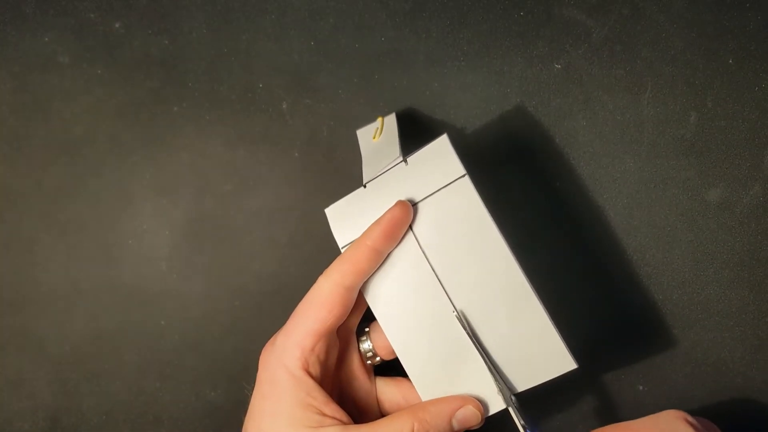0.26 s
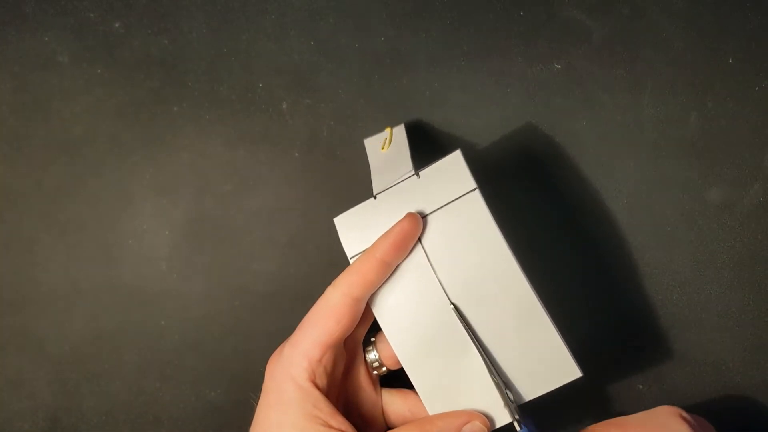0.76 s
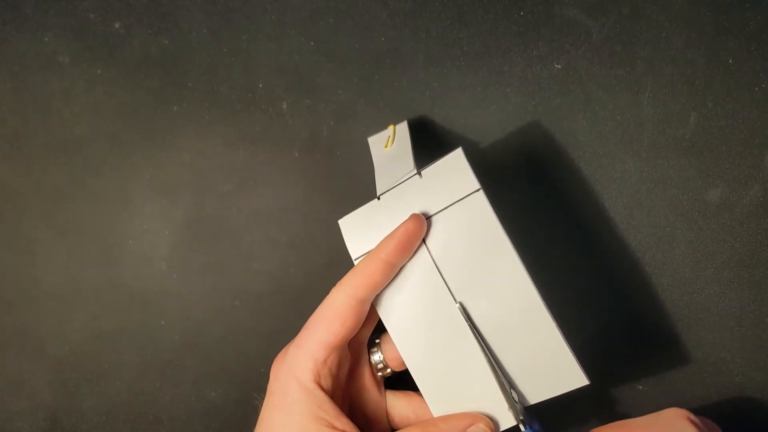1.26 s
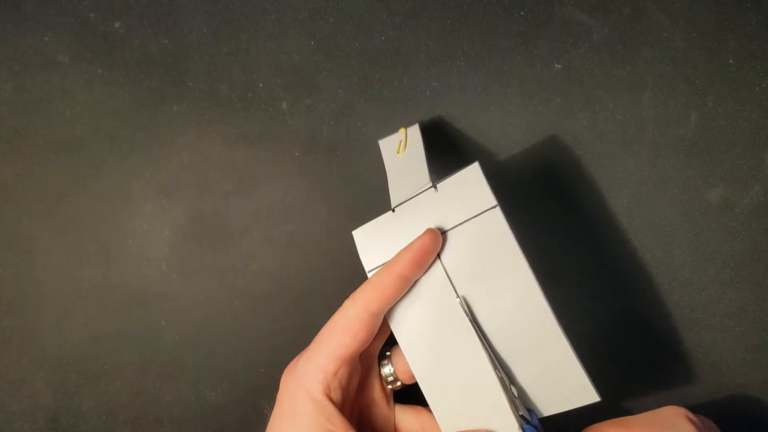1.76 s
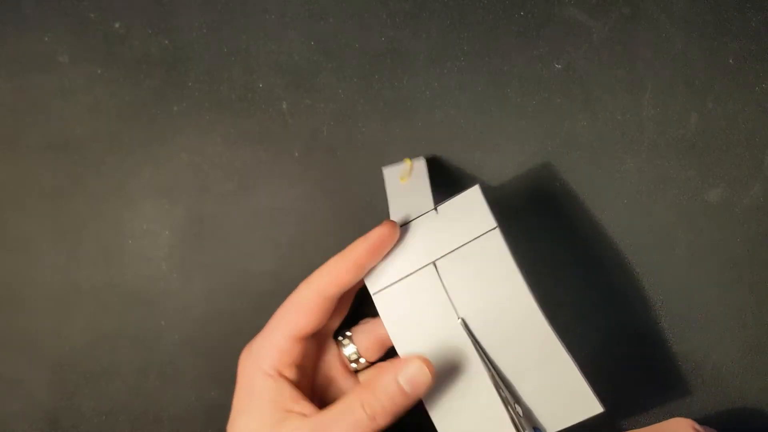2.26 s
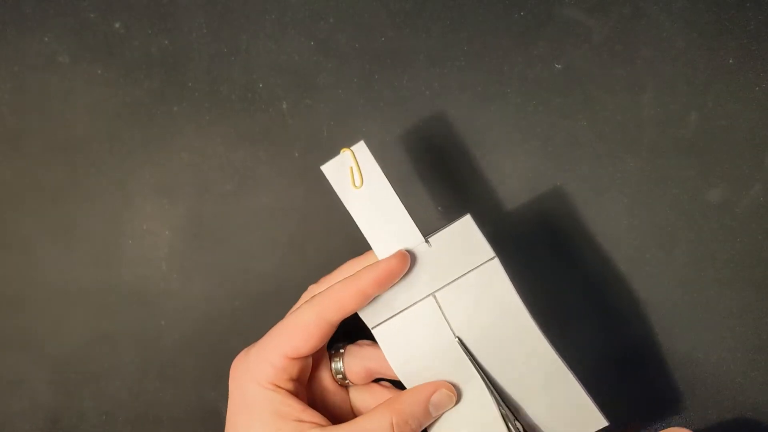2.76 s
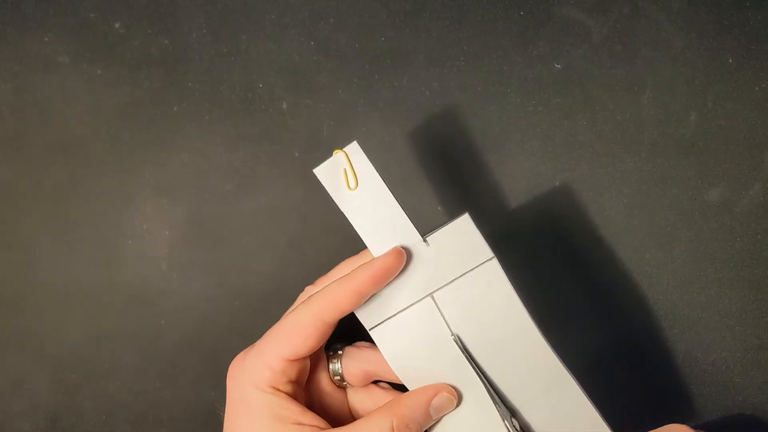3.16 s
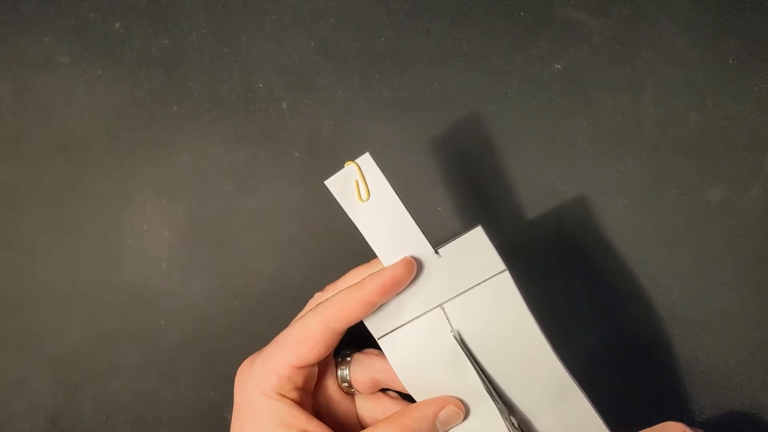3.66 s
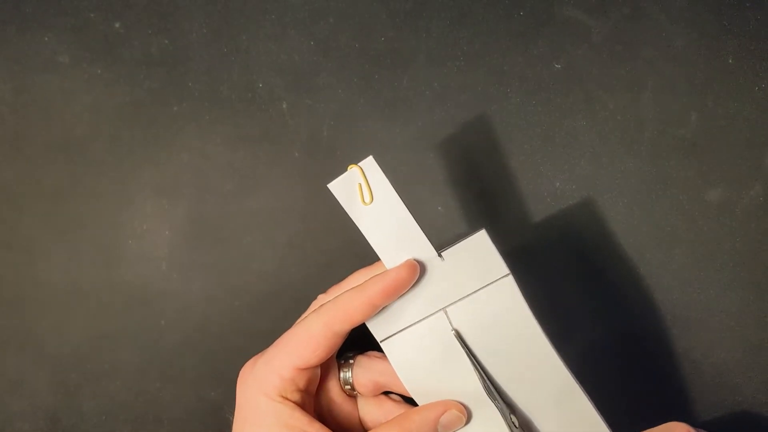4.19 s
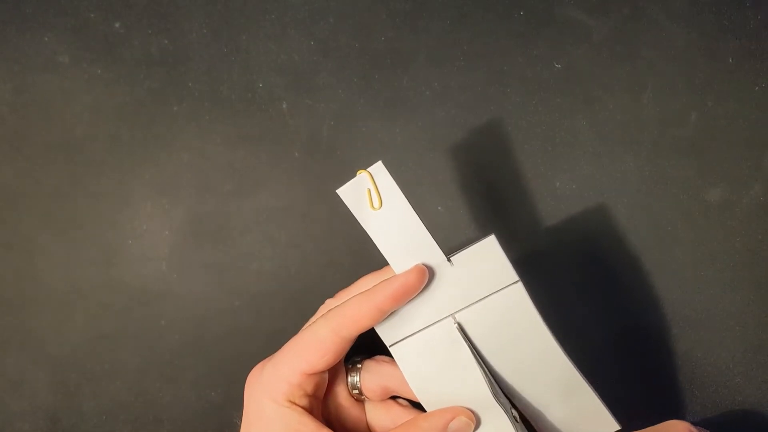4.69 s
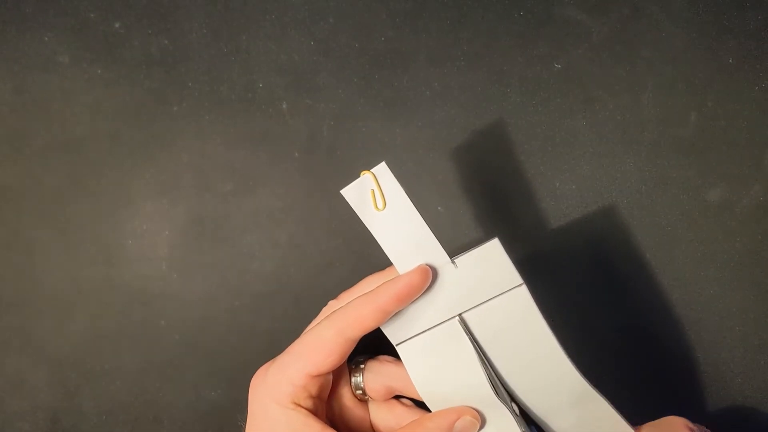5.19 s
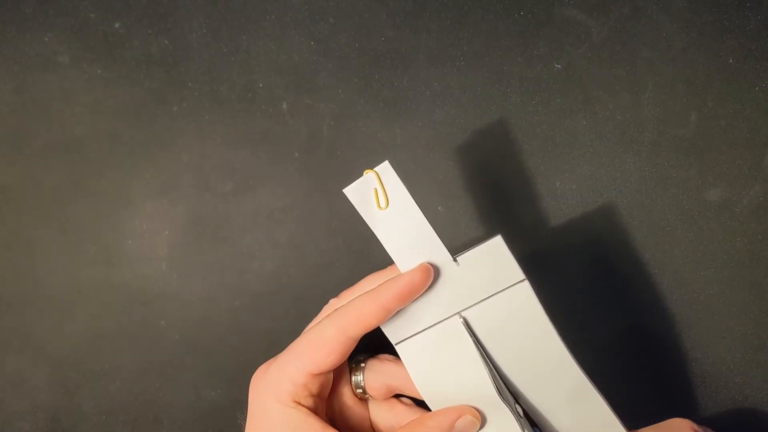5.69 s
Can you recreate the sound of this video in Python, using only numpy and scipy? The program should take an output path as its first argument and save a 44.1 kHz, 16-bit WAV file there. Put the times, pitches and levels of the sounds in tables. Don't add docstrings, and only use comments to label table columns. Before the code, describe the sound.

Irregular crisp scissor cuts through hand-held card, sharp snaps, rustling sheet and small steel clicks over a quiet low hum.

```python
import sys
import numpy as np
from scipy import signal
from scipy.fft import rfft, irfft, next_fast_len
from scipy.io import wavfile
from scipy.ndimage import uniform_filter1d, map_coordinates

SR = 44100
rng = np.random.default_rng(int(sys.argv[2]) if len(sys.argv) > 2 else 0)


def unload_audio(sound):
    columns = np.transpose(np.atleast_2d(sound))
    steps = np.round(np.clip(columns, -1, 1) * 32767)
    wavfile.write(sys.argv[1], SR, steps.astype(np.int16))


def ratio(d):
    e = np.asarray(d, float) / 20
    return 10 ** e


N = 261720

SIDES = np.array([[1], [-1]])


def unit(x):
    return x / np.sqrt(np.mean(x ** 2) + 1e-20)


def along(points, hz):
    f, value = np.transpose(points)
    return np.interp(np.log(hz + 1), np.log(f + 1), value)


def wobble(rate):
    knots = rng.standard_normal(int(N * rate / SR) + 4)
    return map_coordinates(knots, [np.arange(N) * rate / SR])


def filtered(x, response):
    size = next_fast_len(N + SR // 2)
    hz = np.fft.rfftfreq(size, 1 / SR)
    return irfft(rfft(x, size) * response(hz), size)[..., :N]


def resonant(x, modes):
    def response(f):
        h = 0
        for k, (centre, width, db) in enumerate(modes):
            damping = 1j * f * width
            h = h + (-1) ** k * ratio(db) * damping / (centre * centre - f * f + damping)
        return h / np.sqrt(np.mean(abs(h) ** 2))
    return filtered(x, response)


def spread(blade_db, boom_db, fizz_db, tip_db):
    pivot = 1 / np.sqrt(1 + ratio(tip_db) ** 2)
    return ratio(blade_db) * np.array([pivot, pivot * ratio(tip_db), ratio(boom_db), ratio(fizz_db)])


def shear():
    # t/s, tip over pivot level/dB
    bite = [(.63, 0.5), (.68, 3), (.72, 0.5), (1.37, -3.5), (1.405, 4.5), (1.48, 2), (2.6, 1.5),
            (3.3, -1.5), (3.61, -3), (3.64, 1.5), (3.7, 0), (3.77, 2), (3.9, -1), (5.9, 2.5)]
    now = np.arange(N) / SR
    strengths = np.minimum(rng.exponential(size=N), 5)
    sizes = ratio(3.1 * strengths + 0.7 * wobble(70) + 1.8 * wobble(450))
    fibres = unit(sizes * rng.standard_normal(N))
    coarse = now[::16]
    controls = [np.interp(now, coarse, curve) for curve in strokes(coarse)]
    tip_db = np.interp(now, *np.transpose(bite))
    return spread(*controls, tip_db) * fibres


def strokes(now):
    # start t/s, length/s, level/dB, easing/dB, sheet boom over blades level/dB
    cuts = [(0.624, 0.058, -41, 0, -6), (0.693, 0.066, -44.5, -7, 2.5), (0.971, 0.075, -61.5, 5.5, -1.5),
            (1.364, 0.044, -41.5, -2, -7.5), (1.41, .09, -44, -3, -3.5), (2.502, 0.12, -50.5, -8, -2.5),
            (3.255, 0.14, -69, 3, -3), (3.597, 0.09, -52.5, 1, -5), (3.687, .095, -53, 0, 0),
            (4.277, .11, -52.5, -0.5, -3.5), (4.903, 0.1, -61, 6.5, 1), (5.34, 0.096, -62, -8.5, -1.5)]
    # peak t/s, rise/s, fall/s, level/dB, sheet boom over blades level/dB
    rubs = [(.11, 0.022, 0.11, -55.5, -1.5), (.4, 0.13, 0.25, -68, 8), (0.462, 0.0097, 0.065, -60.5, 17.5),
            (0.638, 0.008, 0.01, -60, 13), (0.858, 0.044, 0.039, -58.5, 4.5), (1.151, .06, 0.13, -59, 6.5),
            (1.522, 0.0066, 0.052, -43.5, 9.5), (1.522, 0.0055, 0.13, -41, -4),
            (1.8, 0.25, 0.066, -58.5, 0), (1.98, 0.027, 0.31, -67, 4), (2.158, 0.063, 0.13, -55, 1),
            (2.36, 0.48, 0.45, -62.5, 0.5), (2.791, 0.34, 0.31, -61.5, -4.5), (2.92, 0.072, 0.067, -59, -4),
            (3.05, 0.3, 0.354, -83, -1), (3.77, .01, 0.15, -75, 16.5), (3.97, 0.045, .1, -55.5, -14),
            (4.03, 0.11, 0.18, -56.5, 4), (4.631, 0.27, 0.091, -65, 5.5), (5.8, 0.042, 0.13, -71, 14.5),
            (5.93, .06, 0.05, -47, 2.5)]
    bite_s, let_go_s = 0.0042, 0.021
    cut_fizz_db, boom_grows_db = -12, -3.5
    rub_depth_db, rub_fizz_db = 22.5, -10
    rest_db, rest_boom_db, rest_fizz_db = -80.5, 5, 0

    rest_power = np.full(len(now), ratio(rest_db) ** 2)
    power = np.outer(ratio([0, rest_boom_db, rest_fizz_db]) ** 2, rest_power)
    for s, length_s, db, ease_db, boom_db in cuts:
        done = np.clip((now - s) / length_s, 0, 1)
        level_db = db + ease_db * done - 60 * np.maximum(now - s - length_s, 0) / let_go_s
        shares_db = [0 * done, boom_db + boom_grows_db * (done - .5), cut_fizz_db + 0 * done]
        bite = np.clip((now - s) / bite_s + .5, 0, 1) ** 2
        power = power + (bite * ratio(level_db + shares_db)) ** 2
    for s, rise_s, fall_s, db, boom_db in rubs:
        away = np.maximum((s - now) / max(rise_s, .002), (now - s) / max(fall_s, .002))
        level_db = db - rub_depth_db * away
        power = power + np.outer(ratio([0, boom_db, rub_fizz_db]) ** 2, ratio(level_db) ** 2)
    blade_db, sheet_db, edge_db = 10 * np.log10(power)
    return blade_db, sheet_db - blade_db, edge_db - blade_db


def snaps():
    crack, burst_late_s = 9, .0009
    force = np.zeros((4, N + SR))
    t = np.arange(SR // 16) / SR
    for s, db, boom_db, fizz_db, tip_db, length_ms in breaks():
        hold = max(length_ms, .3) / 1000
        lead = .0002 + .5 * hold
        after = np.maximum(t - lead - 0.57 * hold, 0)
        fall = ratio(-60 * after / (0.0048 + 4.2 * hold))
        rattle = 0.048 * ratio(-60 * after / 0.035)
        shape = np.clip(t / lead, 0, 1) ** 2 * (fall + rattle)

        grains = ratio(2.67 * rng.exponential(size=len(t))) * rng.standard_normal(len(t))
        grains[round(lead * SR)] = crack * min(1, 0.0024 / hold)
        grains /= np.sqrt(np.sum((shape * grains) ** 2) / np.sum(shape ** 2))

        fade = (1 - t / t[-1]) ** 2
        burst = spread(db, boom_db, fizz_db, tip_db)[:, None] * evened(shape * grains) * fade
        start = round((s + burst_late_s - min(lead, .0008 + .3 * hold)) * SR)
        force[:, start:][:, :len(t)] += burst
    return force[:, :N]


def breaks():
    # t/s, level/dB, sheet boom over blades level/dB, tip over pivot level/dB, length/ms
    snips = [(0.1119, -41, 2, -12, 1.25), (0.4272, -36, -1, 3, 0.8), (0.4438, -24.5, 0.5, 0, 1.63),
             (1.1659, -34, -1.5, 3, 1.6), (1.2102, -41.5, -0.5, 5, 3.4), (1.42, -32, -2.5, -3, 1.9),
             (1.4338, -32.5, 3.5, -2, 1.4), (1.5118, -7.5, -9, 6, .8), (1.816, -30, 2, -6, 0.95),
             (2.275, -45, -4, 13.5, 0.95), (2.509, -28.5, -0.5, 2, 1.97), (3.3081, -38, -19, 5, 1.44),
             (3.3234, -35.5, -13, 5.5, 1.86), (3.45, -32, -10, 5, 0.81), (3.5333, -34.5, -5, 7, 1.35),
             (3.743, -39, 3, -4, 5.4), (3.7499, -23.5, -5.5, -6.5, 1.66), (3.9974, -37.5, -4, -5.5, 4),
             (4.0088, -35.5, -2, -2, 1.18), (4.5698, -37.5, 5, -2.5, 0.81), (4.6557, -39.5, -3, -2, 1.25),
             (5.052, -33, 0.5, -2, 0.84), (5.8786, -38, 3.5, -1, 7.4), (5.9128, -34, 0.5, 3, 6.5)]
    chatter = [(.245, -62, 4, 5, 11), (0.322, -56, -1, 1, 4), (0.354, -60, 5, -5, 3.6),
               (0.618, -54, 9, -2, 3), (1.059, -51, 5.5, 2, 2.2), (1.108, -46, -3, 2, 2.7),
               (1.148, -54, 1, 4, 3.1), (1.177, -53, 10, 6, 2.6), (1.2084, -44.5, -2, -1, 1.1),
               (1.418, -40, 2, 2, 2.1), (1.461, -43, 4, 0, 2.9), (1.509, -28, -1, 7, 1.9),
               (1.5154, -31, 11.5, -8, 1), (1.522, -32.5, 7, 5, 1.5), (1.5301, -39, 3, 0, 1.3),
               (2.1646, -43.5, 9.5, -4, 0.55), (2.284, -52, 2, 8, 8.5), (2.409, -64, 4, 4, 1.07),
               (3.7335, -54, -10, 2, 1.7), (3.761, -51, 9, -4, 3.2), (3.769, -52, 5, 2, 2.5),
               (4.0682, -44, -4, 4, 1.5), (4.072, -53, 6, -4, 2.1), (4.1479, -38.5, 4.5, -5, 0.86),
               (4.626, -57.5, 7, -5, 2.8), (4.6591, -38, -4.5, -2, 1.4), (4.587, -56, 3, -6, 3.6),
               (1.785, -54, 2.5, 1.5, 1.7), (1.964, -51, 0.5, 1, 2.6), (1.985, -62, -9, 4, 1.6),
               (2.013, -56, -2, -11, 2), (1.8135, -47, 0.5, -7, 0.97), (4.506, -52, -4, -10, 3),
               (4.559, -54, -8, -6, 3.4), (4.678, -58, -1, -7, 3), (4.62, -49, -6, 3, 3.8)]
    # t/s, level/dB, tip over pivot level/dB
    slips = [(1.734, -48, 10), (1.759, -46, 5), (1.769, -42.5, -3), (1.9485, -45.5, -1), (1.969, -41.5, 4),
             (1.99, -42, 10), (2.0067, -42, -3), (2.088, -51.5, -5), (2.18, -50, -8), (3.8716, -49.5, -5),
             (3.9236, -48.5, -9)]
    # boom level/dB, fizz level/dB, length/ms
    slip = (-3.5, -16, 1.4)
    # t/s, level/dB, length/ms
    ticks = [(.0814, -51.5, 7.3), (.223, -58.5, 4), (.3782, -54.5, 17), (.412, -51, 13), (3.03, -62, 6.3),
             (3.065, -68, 4.8), (.9788, -55, 7.5), (1.0401, -54, 2.6), (1.0646, -47, 1.5),
             (1.1195, -51, 4.5), (3.13, -67, 3), (2.3212, -56, 5.9), (2.5845, -46.5, 13.8),
             (2.9088, -52, 6.6), (3.2587, -51, 10), (3.284, -55, 12), (3.349, -51, 9.6), (3.3748, -49, 14),
             (3.4145, -48, 3.5), (3.4688, -39.5, 1.34), (3.5993, -66, 3.9), (3.6071, -48, 1.6),
             (3.949, -43.5, 1.1), (4.0232, -41, 1.4), (4.0403, -42.5, 2.1), (4.5074, -55, 7.1),
             (2.96, -60, 2.2), (5.1622, -52, 4.1), (5.4003, -52, 2.2), (5.8152, -48, 5.3)]
    # boom level/dB, fizz level/dB, tip level/dB
    tick = (-6.5, -7, -0.11)
    # t/s, level/dB, length/ms
    creases = [(.1407, -56, 9.9), (.289, -58.5, 9.6), (.3382, -56.5, 7.4), (.3926, -53.5, 3.4),
               (1.099, -48.5, 4.8), (1.789, -50, 3.1), (1.809, -43, 4.5), (1.8413, -52.5, 6.8),
               (2.0275, -45.5, 3.9), (2.035, -46.5, 4.3), (2.879, -59.5, 6.6), (3.722, -44.5, 7.5),
               (3.972, -55, 14), (4.063, -46.5, 3.8), (4.0925, -44.5, 3.1), (4.1415, -42, 3),
               (4.2895, -53.5, 5), (4.5285, -53.5, 5.5), (4.6388, -52.5, 4.1), (5.187, -57.5, 16),
               (5.3844, -55.5, 2.8), (5.768, -49, 1.5), (5.8008, -50.5, 7.6), (5.835, -48, 1.4),
               (5.8435, -44.5, 6.4)]
    # boom level/dB, fizz level/dB, tip level/dB
    crease = (4.8, -6.5, -2)
    # t/s, level/dB, length/ms, sheet boom level/dB
    buckles = [(0.7051, -35, 3.7, -13), (0.732, -39, 4.3, -14), (2.13, -52.5, 4.3, 7.5),
               (2.1628, -46, 3.04, 2), (2.211, -53, 2, 5), (2.25, -42, 7.3, 0.5), (2.294, -53, 5.5, 0),
               (2.394, -50, 10.6, 7.5), (3.6988, -51, 15, 12), (4.345, -60, 5.2, 13),
               (4.3707, -50.5, 3.7, 8.5), (4.459, -63.5, 6.4, 12), (4.477, -40, 0.44, 3),
               (4.6125, -46, 8.6, -9), (4.7129, -46.5, 0.56, 13.5), (4.9058, -49, 5, -3),
               (4.9221, -47.5, 2.76, 8), (4.9754, -58.5, 16.7, 12), (5.183, -41, 2.34, -3),
               (5.583, -50.5, 2, 1), (5.59, -56.5, 3.4, 8)]
    # fizz level/dB, tip level/dB
    buckle = (-15.5, -7)

    rows = []
    for s, db, boom_db, tip_db, ms in snips + chatter:
        fizz_db = -9.5 + 0.99 * tip_db
        rows.append((s, db, boom_db, fizz_db, tip_db, ms))
    for s, db, tip_db in slips:
        rows.append((s, db, *slip[:2], tip_db, slip[2]))
    for table, colour_db in ((ticks, tick), (creases, crease)):
        rows += [(s, db, *colour_db, ms) for s, db, ms in table]
    for s, db, ms, boom_db in buckles:
        rows.append((s, db, boom_db, *buckle, ms))
    return rows


def evened(burst):
    z = rfft(burst)
    local_power = uniform_filter1d(abs(z) ** 2, size=25)
    flat = irfft(z / np.sqrt(local_power + 1e-12), len(burst))
    return flat * np.linalg.norm(burst) / np.linalg.norm(flat)


def card(force):
    # f/Hz, width/Hz, level/dB
    pivot_modes = [(2627, 437, -3.5), (3267, 300, 3.6)]
    # f/Hz, width/Hz, level/dB
    tip_modes = [(4710, 647, 1.63), (5260, 1450, -4.5)]
    # f/Hz, width/Hz, level/dB
    sheet_modes = [(620, 340, -9), (1035, 218, 3), (1260, 480, -1), (1690, 342, 0)]
    # f/Hz, width/Hz, level/dB
    fibre_modes = [(6510, 1330, -1), (10210, 2830, 0), (11500, 2230, 1), (15430, 4100, -8.5)]

    def closing(top_hz):
        return lambda f: 1 / (1 - (f / top_hz) ** 2 + 1j * np.sqrt(2) * f / top_hz)

    pivot, tip, sheet = map(bending, force, (pivot_modes, tip_modes, sheet_modes))
    edge = resonant(force[3], fibre_modes)
    return filtered(pivot + tip, closing(6800)) + filtered(sheet, closing(2300)) + edge


def bending(x, modes):
    bend, bend_rate = .022, 6
    share = .5 + .5 * np.tanh(wobble(bend_rate))

    def tuned(by):
        return [(hz * by, width_hz, db) for hz, width_hz, db in modes]

    return resonant(x * share, tuned(1 + bend)) + resonant(x * (1 - share), tuned(1 - bend))


def singing(force):
    # f/Hz, width/Hz, level/dB
    pivot_steel = [(2440, 110, -1.5), (2942, 250, -1), (3264, 160, -0.5)]
    # f/Hz, width/Hz, level/dB
    tip_steel = [(4938, 257, 4), (5560, 215, -2), (7200, 400, -4), (10000, 120, -12.5)]
    # f/Hz, width/Hz, level/dB
    spans = [(734, 50, -6.5), (936, 22, 3.5), (1023, 35, 1), (1117, 13, 1.5), (1265, 50, -1),
             (1586, 49.2, -7.5)]
    narrow = map(resonant, force, (pivot_steel, tip_steel, spans))
    return sum(ratio(db) * part for db, part in zip((-5, -1.5, -3), narrow))


def rings():
    # t/s, f/Hz, peak level/dB, t60/s
    freed = [(.4438, 995, -19.5, 0.037), (0.445, 1480, -43, 0.012), (1.4346, 1210, -16, 0.01),
             (1.5122, 8100, -20, 0.0022), (1.5113, 4870, -19, .005), (1.5113, 2880, -17, 0.0069),
             (1.5115, 902, -21.5, 0.02), (1.5175, 982, -20.5, 0.034), (2.036, 600, -47, 0.17),
             (4.613, 783, -37, 0.063), (1.5165, 1156, -29, 0.051), (1.969, 4900, -36.5, 0.0099),
             (1.991, 4840, -35.5, 0.018), (3.45, 2980, -18.5, 0.008), (3.449, 1390, -22.5, 0.0075),
             (.452, 940, -35, .2), (4.713, 1253, -34.5, 0.014), (5.0528, 1305, -38, 0.016),
             (5.7688, 930, -41, .1), (5.801, 915, -44, .12), (5.8445, 929, -39, .1),
             (5.8845, 1570, -27, .014), (5.885, 4900, -33, .008), (5.9155, 1680, -31, .02),
             (5.82, 4800, -39, .009), (5.815, 3200, -45, .02), (5.763, 3000, -49, .015),
             (3.7512, 2950, -24, .007), (3.7495, 1000, -28, .02), (3.724, 1340, -36, .04),
             (3.701, 1100, -38, .03), (3.607, 3300, -41, .014), (3.998, 3100, -37, .011),
             (3.999, 4500, -37, .009), (4.009, 3150, -39, .009), (4.009, 4450, -38, .008),
             (4.0715, 851, -31, .018), (4.0925, 834, -38, .025), (4.065, 3200, -41, .011),
             (4.095, 4800, -39, .012), (4.041, 3000, -43, .011), (4.659, 3240, -41, .011),
             (4.66, 5400, -44, .008), (4.505, 2880, -46, .015), (2.252, 2900, -43, .014),
             (2.276, 3200, -45, .011), (2.397, 1500, -44, .018), (2.1655, 1500, -43, .011),
             (1.517, 1330, -24, .018), (5.7686, 1250, -34, .012)]
    beat = 0.059
    out = np.zeros(N + SR)
    t = np.arange(SR // 8) / SR
    for s, hz, db, t60 in freed:
        pair = np.sin(2 * np.pi * hz * t) + 0.5 * np.sin(2 * np.pi * hz * (1 + beat) * t)
        onset = 1 - np.exp(-(t * hz) ** 2)
        out[round(s * SR):][:len(t)] += ratio(db - 60 * t / t60) * pair * onset
    return out[:N]


def thumps():
    # t/s, level/dB
    pushes = [(1.166, -45.5), (2.508, -46), (3.693, -44), (3.707, -43.5), (3.747, -50), (4.066, -44),
              (4.097, -40.5), (4.151, -50), (1.152, -46.5), (1.179, -49), (5.051, -50)]
    # f/Hz, width/Hz, level/dB
    flap = [(360, 200, 0), (650, 410, -0.5)]
    force = np.zeros(N + SR)
    push = np.hanning(420) ** 2
    for s, db in pushes:
        ragged = evened(push * rng.standard_normal(len(push)))
        force[round(s * SR) - len(push) // 2:][:len(push)] += ratio(db + 3) * ragged
    return resonant(resonant(force[:N], flap), [(576, 1200, 0)]) * ratio(-9.0)


def slides():
    # middle t/s, length/s, level/dB
    hisses = [(2.324, 0.032, -57), (1.524, 0.06, -49.5), (1.575, 0.086, -56), (1.641, .14, -66),
              (2.357, 0.6, -70), (2.698, 0.073, -72), (4.64, 0.14, -68), (2.795, 0.17, -66),
              (3.28, 0.05, -69.5), (3.684, 0.25, -57.5), (4.016, .14, -63), (.895, .008, -68),
              (.88, .3, -76), (1.01, .02, -62), (5.92, .03, -52), (5.184, 0.017, -54), (5.832, 0.088, -64)]
    # f/Hz, width/Hz, level/dB
    hiss_modes = [(6500, 3400, -2.5), (9450, 3200, 2), (13700, 2700, 1)]
    now = np.arange(N) / SR
    swell = sum(ratio(db) * np.exp(-2 * ((now - s) / length_s * 2) ** 2) for s, length_s, db in hisses)
    return resonant(swell * ratio(3.5 * wobble(200)) * rng.standard_normal(N), hiss_modes)


def facing(x):
    # t/s, treble level/dB
    angle = [(0, 2), (.5, 2), (.61, -4), (.8, -3), (1.3, -2), (1.7, -2.5), (2, 1), (2.6, 2), (3.3, 3),
             (3.6, 1), (4.3, 2), (5.1, 0), (5.7, 3), (5.93, 6)]
    s, treble_db = np.transpose(angle)
    treble = filtered(x, lambda f: 1 / (1 + (9500 / (f + 1)) ** 6))
    return x + (ratio(np.interp(np.arange(N) / SR, s, treble_db)) - 1) * treble


def ports(x):
    # t/s, left-right level/dB
    drift = [
        (0.0, -4),
        (1.0, -4.5),
        (1.44, -6),
        (1.5, 0),
        (1.7, -5),
        (2.6, -5.5),
        (3.4, -3),
        (4.1, -4.5),
        (5.93, -2.5),
    ]
    s, pan_db = np.transpose(drift)
    pan_db = np.interp(np.arange(N) / SR, s, pan_db)
    return shaded(x, 1.0, 4.6 / SR) * ratio(SIDES * pan_db / 2)


def shaded(x, share, lag):
    # f/Hz, left-right level/dB
    shade = [(200, -9), (800, 6), (1500, 3), (3000, -4), (6800, -9), (8300, -11.5), (10600, -50.5),
             (15000, -16.5)]

    def response(hz):
        gain = ratio(SIDES * share * along(shade, hz) / 2)
        delay = np.exp(-1j * np.pi * hz * lag * SIDES)
        return gain / np.sqrt(np.mean(gain ** 2, axis=0)) * delay
    return filtered(x, response)


def room(x):
    # f/Hz, t60/s
    decay = [(300, 0.5), (600, .3), (1000, 0.3), (3000, 0.31), (6000, .31), (9000, 0.28), (12000, .24),
             (15000, 0.18)]
    out = np.zeros((2, N + SR))
    step = SR // 8
    for at in range(0, N, step):
        hz, t, z = signal.stft(rng.standard_normal((2, SR // 2)), SR, nperseg=128)
        walls = ratio(-60 * t / along(decay, hz)[:, None]) * (1 - np.exp(-t / 0.00099))
        near = 1.66 * ratio(-60 * t / 0.019)
        tail = signal.istft(z * (walls + near), SR, nperseg=128)[1]
        answer = signal.fftconvolve(x[:, at:at + step], tail / np.linalg.norm(tail[0]), axes=1)
        out[:, at + 30:at + 30 + answer.shape[1]] += answer
    return out[:, :N]


def air():
    # f/Hz, level per Hz/dB
    noise = [(15, -45.5), (25, -24), (53, -13), (111, -3.5), (232, -4), (313, -3.5), (496, -6.5),
             (831, -17), (952, -20.5), (1220, -23), (8370, -37.5), (12200, -45.5), (15200, -56),
             (16500, -60.5)]
    # f/Hz, correlation
    alike = [(30, .4), (60, 0.73), (130, 0.79), (290, 0.91), (640, 0.27), (1410, 0.43), (3100, 0.97),
             (6820, 0.13), (15000, -0.16)]
    # f/Hz, left-right level/dB
    balance = [(60, 0.6), (180, 0.5), (550, -1), (1650, -5), (4970, 2), (15000, -1.5)]
    # f/Hz, width/Hz, level/dB
    appliance = [(56, 14, -72), (108, 14, -69), (135, 9, -67.5), (207, 6, -70), (241.5, 4, -66),
                 (361, 5, -74), (484, 3, -71)]

    def mid_side(hz):
        angle = np.arccos(np.clip(along(alike, hz), -1, 1)) / 2
        return ratio(along(noise, hz)) * [np.cos(angle), np.sin(angle)]

    mid, side = filtered(rng.standard_normal((2, N)), mid_side)
    pair = filtered(np.array([mid + side, mid - side]), lambda hz: ratio(SIDES * along(balance, hz) / 2))

    hum = 0
    for hz, width_hz, db in appliance:
        band = filtered(rng.standard_normal(N), lambda f: 1 / (1 + (2 * (f - hz) / width_hz) ** 2))
        hum = hum + ratio(db) * unit(band)

    motor_hz, wander_hz, motor_db, sway_db = 105.5, 3.5, -65, 2.5
    turns = np.cumsum(motor_hz + wander_hz * wobble(6)) / SR
    drone = ratio(motor_db + sway_db * wobble(9)) * np.sqrt(2) * np.sin(2 * np.pi * turns)
    return ratio(-57.5 + .8 * wobble(3)) * unit(pair) + hum + drone


def scene():
    steady, sudden = shear(), snaps()
    sound = card(ratio(2.0) * steady + sudden) + singing(steady + ratio(-8) * sudden)
    sound = sound + thumps() + slides()
    spans = rings()
    direct = ports(facing(sound) + spans)
    answer = room((sound + ratio(-7) * spans)[None])
    return direct + ratio(-6.5) * shaded(answer, 0.45, 0) + air()


def roll_off(x):
    return signal.sosfilt(signal.butter(12, 16850, fs=SR, output="sos"), x)


def record(dry):
    # f/Hz, level/dB
    top = [(15200, -2), (15700, -15), (16000, -31), (16800, -36.5)]
    rounded = dry / (1 + abs(dry / .95) ** 4) ** (1 / 4)
    return roll_off(filtered(rounded, lambda hz: ratio(along(top, hz))))


dry = scene()
out = record(dry)
unload_audio(out)
```